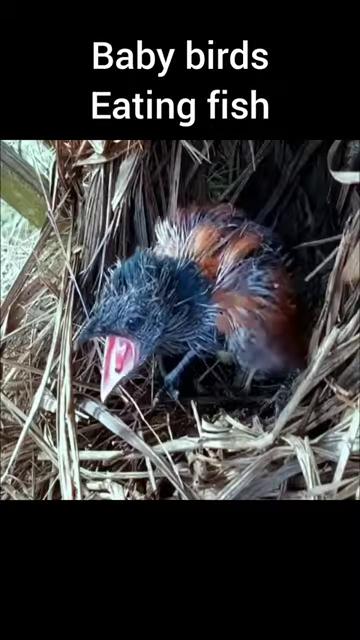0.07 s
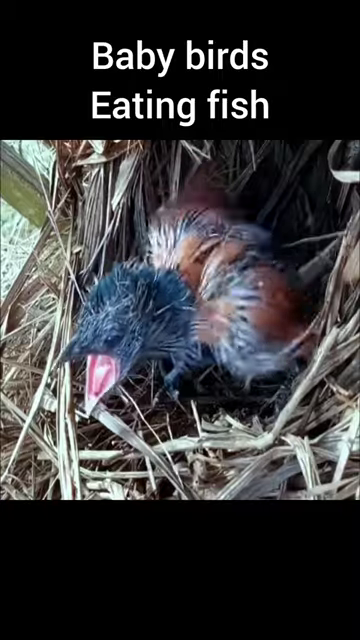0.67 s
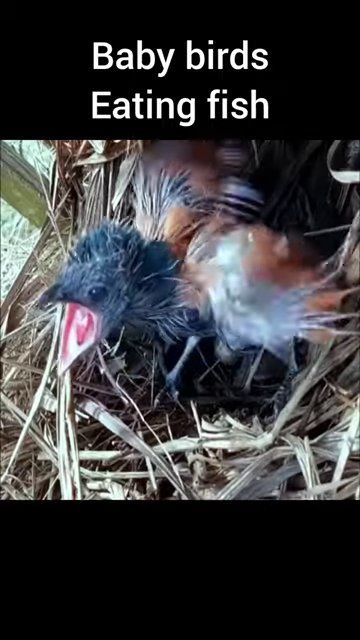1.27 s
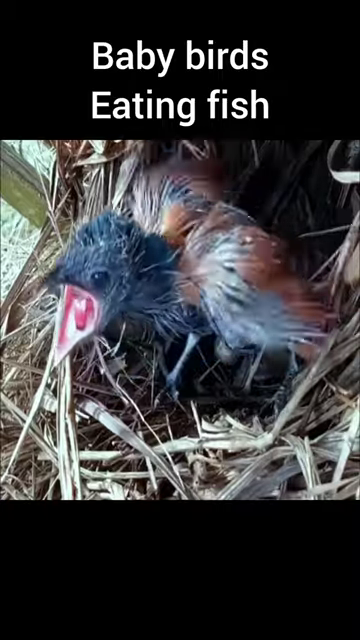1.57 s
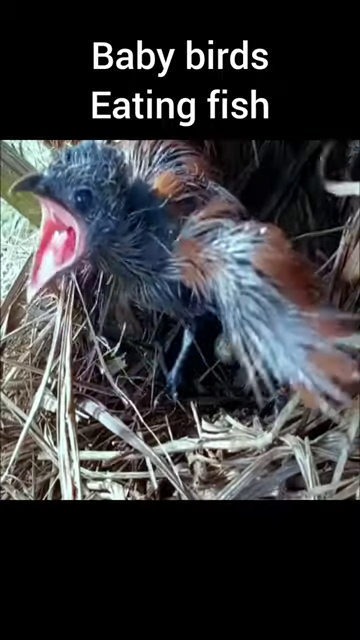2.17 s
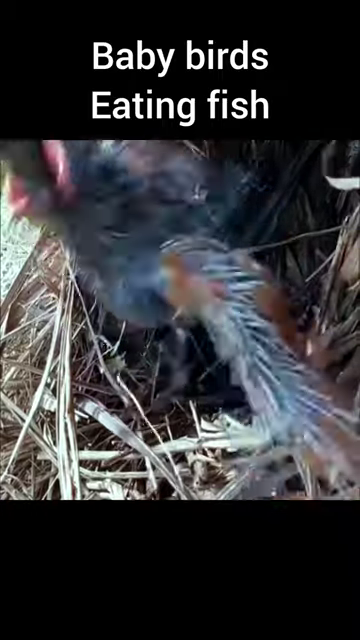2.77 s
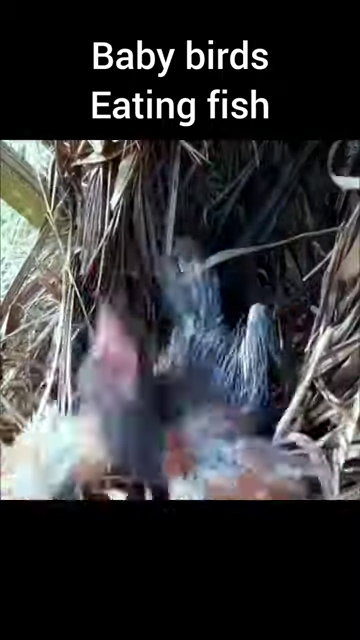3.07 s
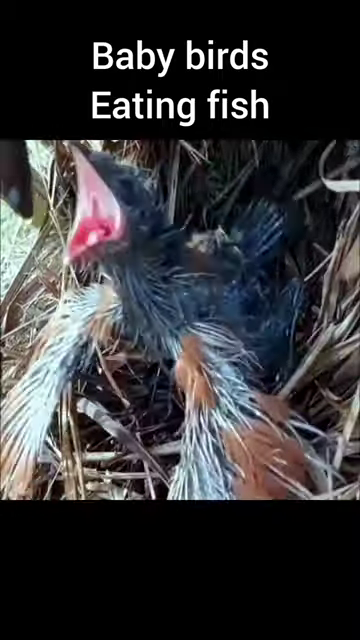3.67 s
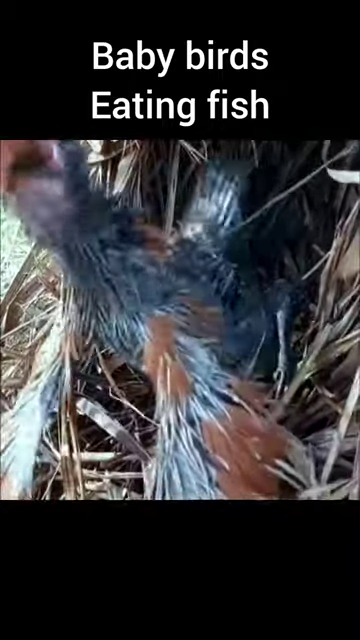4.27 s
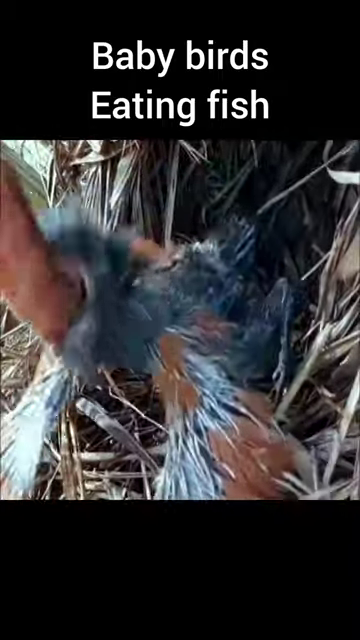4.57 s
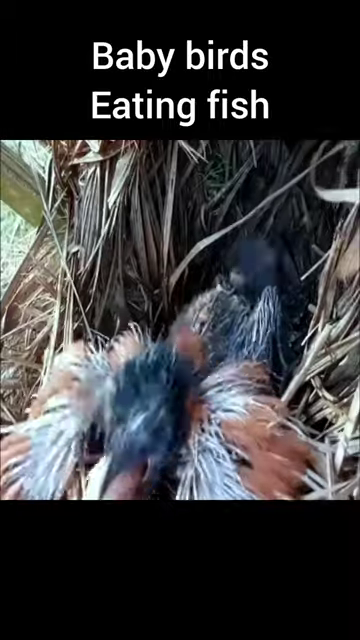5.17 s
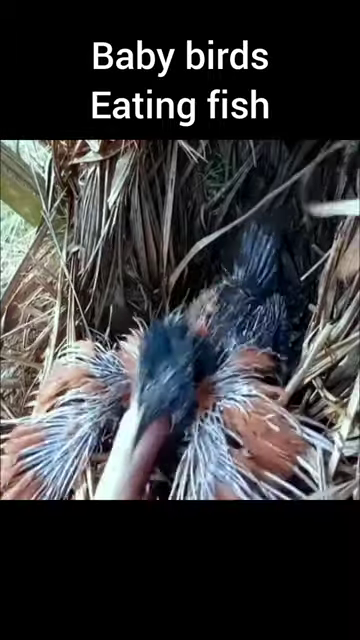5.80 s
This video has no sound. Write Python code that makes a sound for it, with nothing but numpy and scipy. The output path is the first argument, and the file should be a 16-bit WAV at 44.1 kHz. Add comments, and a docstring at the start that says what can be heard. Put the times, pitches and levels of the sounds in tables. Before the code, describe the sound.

A baby bird hisses harshly six times up close, then gulps and rustles in its dry nest, with a faint engine drone far off.

```python
"""A nest of dry leaves, a stereo microphone right beside it. An engine drones far off; the litter stirs.
A nestling gapes and hisses six times: a spit of pent-up air, then ragged turbulence in its throat,
whose resonance sinks as the beak closes. From the fourth hiss on come soft low thumps, ticks of
beak and straw and quiet murmurs. The bird gives a short gulping rasp, then shuffles in the litter,
dragging its quills over the straw and shoving against the woven floor."""
import sys
import numpy as np
from scipy import signal
from scipy.fft import rfft, irfft, next_fast_len
from scipy.io import wavfile
from scipy.ndimage import uniform_filter1d, map_coordinates

SR = 44100
rng = np.random.default_rng(int(sys.argv[2]) if len(sys.argv) > 2 else 0)


def master_out(mix):
    """Clip the mix to full scale and print it as 16-bit PCM to the path in sys.argv[1]."""
    frames = np.transpose(np.atleast_2d(mix))
    ceiling = np.clip(frames, -1, 1)
    pcm = np.round(ceiling * 32767).astype(np.int16)
    wavfile.write(sys.argv[1], SR, pcm)


N = 266319
TIME = np.arange(N) / SR


def amp(db):
    """Decibels to gain."""
    return 10 ** (np.asarray(db) / 20)


def unit(x):
    """Scale to rms 1."""
    return x / np.sqrt(np.mean(x ** 2) + 1e-20)


def along(points, hz):
    """Read (f/Hz, value) points on a log frequency axis."""
    f, v = np.transpose(points)
    return np.interp(np.log(hz + 1), np.log(f + 1), v)


def curves(rows, t=TIME):
    """Each column after the time, read at the times t."""
    s, *cols = np.transpose(rows)
    return [np.interp(t, s, c) for c in cols]


def wobble(rate):
    """A smooth random curve, rate knots a second."""
    return map_coordinates(rng.standard_normal(int(N * rate / SR) + 4), [TIME * rate], order=2)


def filtered(x, response):
    """Pass x through a response given as a function of frequency."""
    m = next_fast_len(N + SR // 4)
    return irfft(rfft(x, m) * response(np.fft.rfftfreq(m, 1 / SR)), m)[..., :N]


def coloured(x, spectrum):
    """Shape x by (f/Hz, level/dB) points, at rms 1."""
    return unit(filtered(x, lambda hz: amp(along(spectrum, hz))))


def resonance(hz, centre, width):
    """Gain of one resonance, 1 at its centre."""
    return 1 / np.sqrt(1 + (2 * (hz - centre) / width) ** 2)


def lumps(shape, frames):
    """A random field over frequency and time, smoothed along both, at rms 1."""
    field = uniform_filter1d(rng.standard_normal(shape), size=3, axis=-2)
    return unit(uniform_filter1d(field, size=frames, axis=-1))


def patchy(x, depth_db, frames):
    """Patches of the spectrum, a few hundred Hz wide, come and go."""
    z = signal.stft(x, nperseg=512)[2]
    return signal.istft(z * amp(depth_db * lumps(z.shape, frames)), nperseg=512)[1][..., :N]


def strokes(rows):
    """Gain of body movements that swell and fade."""
    return sum(amp(db) * np.exp(-(2 * (TIME - s) / length) ** 2) for s, length, db in rows)


def airflow():
    """Three rays of unrelated noise: toward the microphone, the left wall and the right wall."""
    return rng.standard_normal((3, N))


def spread(rays, alike):
    """Fold three rays to left and right; alike is the share of power from the direct ray."""
    return np.sqrt(alike) * rays[0] + np.sqrt(1 - alike) * rays[1:]


# the far engine's firing rate: t/s, f/Hz
ENGINE_FIRING = [(2.75, 90.9), (2.95, 80), (4.4, 78.6), (6.04, 75.2)]
# drone and rumble as heard, ducking under the loud hisses: t/s, drone level/dB, rumble level/dB
HEARD_LOW_LEVELS = [(0.4, -41.5, -45), (1.4, -46.5, -46), (1.8, -45, -51.5), (2.45, -48.5, -47.5),
                    (2.85, -44.5, -42.5), (3.15, -50.5, -49.5), (3.75, -53.5, -52), (4.2, -52, -44.5),
                    (6.04, -48, -41.5)]
# the rumble's spectrum: f/Hz, level/dB
RUMBLE_SPECTRUM = [(20, -10), (45, 0), (80, 3), (160, -0.5), (280, -12.5), (420, -13.5), (700, -17),
                   (1500, -58), (5000, -27.5), (15000, -36)]


def engine(waver, second_db, throb_db):
    """An engine far away: only the lowest firing orders and a rumble carry to the microphone."""
    firing_hz, = curves(ENGINE_FIRING)
    drone_db, rumble_db = curves(HEARD_LOW_LEVELS)
    phase = 2 * np.pi * np.cumsum(firing_hz * (1 + waver * wobble(25))) / SR
    orders = unit(np.sin(phase) + amp(second_db) * np.sin(2 * phase))
    drone = amp(drone_db + throb_db * wobble(18)) * orders
    air = rng.standard_normal(N) + 0.5 * rng.standard_normal((2, N))
    return drone + amp(rumble_db) * coloured(air, RUMBLE_SPECTRUM)


# faint, constant stirring of the litter: t/s, level/dB
LITTER_STIR = [(2.3, -53.5), (4.0, -57), (4.6, -48), (5.8, -49.5)]
# the bird's shuffles: middle t/s, length/s, level/dB
LITTER_SHUFFLES = [(0.5, 0.4, -41), (1.6, 0.33, -45), (2.94, 0.64, -39), (4.25, 0.72, -48),
                   (4.785, 0.12, -41), (4.89, 0.11, -36.5), (5.02, 0.18, -40.5), (5.14, 0.14, -37),
                   (5.255, 0.075, -39), (5.41, 0.11, -40), (5.54, 0.19, -41), (5.99, 0.15, -37)]
# dry leaves at close range: f/Hz, level/dB
LITTER_SPECTRUM = [(150, -32), (330, -3.5), (600, -3), (1300, -6), (2200, -4.5), (4000, -2.5), (6400, -4),
                   (8000, -8.5), (15000, -7.5)]


def litter(crackle, uneven_db, snaps_per_s, snap_db):
    """Close by, quills scrape dry leaves in dense small crackles, and single fibres snap."""
    stir_db, = curves(LITTER_STIR)
    motion = np.hypot(amp(stir_db), strokes(LITTER_SHUFFLES)) * amp(uneven_db * wobble(23.91))
    snapping = rng.random((2, N)) < snaps_per_s / SR
    snaps = amp(snap_db) * snapping * rng.standard_normal((2, N))
    friction = rng.standard_normal((2, N)) + 0.16 * rng.standard_normal(N)
    leaves = snaps + patchy(friction, depth_db=4.0, frames=8)
    return motion * coloured(crackle * leaves, LITTER_SPECTRUM)


# the spit that opens each hiss: t/s, level/dB
BEAK_SPITS = [(.053, -25), (.589, -24), (1.6285, -22), (2.43, -24), (3.044, -24), (3.421, -24)]
# its spectrum: f/Hz, level/dB
SPIT_SPECTRUM = [(300, -20), (1200, -7), (3500, -4), (5500, 0), (9500, -2), (15000, -4)]


def spits(decay_s):
    """Pent-up air breaks loose at the beak in a sharp broadband burst."""
    burst = sum(amp(db) * np.exp(-np.abs(TIME - s) / decay_s) * (TIME >= s) for s, db in BEAK_SPITS)
    return burst * coloured(airflow(), SPIT_SPECTRUM)


# six hisses and the gulp: start t/s, end t/s, attack/s, release/s, throat level/dB,
# then sizzle/dB, ring/dB and rush/dB re the throat, and muffling (weighted by frequency in throat)
CALLS = [(0.053, 0.454, 0.0014, 0.076, -23.5, -3.5, -4.5, -15, 0.5),
         (0.581, 1.476, 0.011, 0.07, -22.5, -3.5, -4, -16.5, -3.5),
         (1.6275, 2.275, 0.00088, 0.066, -22.5, -2, -7.5, -17.5, -4.5),
         (2.424, 2.882, 0.0067, 0.13, -21.5, -5.5, -14, -19.5, 6),
         (3.033, 3.326, 0.012, 0.061, -22.5, -3.5, -8, -17, -3),
         (3.414, 3.955, 0.013, 0.063, -20, -6.5, -6, -23.5, 1.5),
         (4.193, 4.305, 0.035, 0.039, -26, -2, -2, -25, -16)]
# the breath surges and falters: t/s, level change/dB
BREATH_HEAVES = [(0.084, -2), (0.124, -2), (.165, 3), (.62, 1.5), (.68, 0.5), (.94, -1.5), (1.16, 0.5),
                 (1.27, 1), (1.33, 0), (1.86, -2), (1.96, 1), (2.11, -0.5), (2.52, 0.5), (2.599, 1.5),
                 (2.72, -3.5), (3.07, 1.5), (3.14, -1), (3.22, 0.5), (3.53, -2), (3.69, -4), (3.79, 0.5)]
# sizzle at the beak's edges: f/Hz, level/dB
SIZZLE_SPECTRUM = [(5000, -44), (7300, 5), (8000, 0), (11500, 0), (12500, 1.3), (13700, -0.5), (16000, -1)]
# ring of the open gape: f/Hz, level/dB
RING_SPECTRUM = [(6000, -67), (7900, -5.5), (8500, 0), (9250, 1), (10250, -3), (10600, -35), (13000, -50)]
# low rush deep in the gullet: f/Hz, level/dB
RUSH_SPECTRUM = [(230, -51), (330, -10.5), (440, .5), (750, -1.5), (1200, -.5), (1900, -6), (4000, -46)]


def hisses(rasp_db, flutter_db, gurgle_db, sag_db, release_db):
    """Right at the microphone, tiny irregular puffs excite throat, beak, gape and gullet together."""
    start, end, attack, release, level_db, sizzle_db, ring_db, rush_db, _ = call_at(TIME)
    age = np.maximum(TIME - start, 0)
    # the push weakens over a call, then collapses during the release
    collapse = np.maximum(1 + (TIME - end) / release, 0) ** 2
    fade_db = sag_db * age / (end - start) + release_db * collapse
    heave_db = sum(db * np.exp(-((TIME - s) / 0.021) ** 2) for s, db in BREATH_HEAVES)
    push = np.minimum(age / attack, 1) * amp(level_db - fade_db + heave_db + 0.1 * wobble(20))
    puffs = sputter(per_s=38, size_db=-5.5, decay_s=0.00089)
    puffs *= amp(rasp_db * wobble(1500) + flutter_db * wobble(82))

    body = throat(puffs * airflow(), overtone=2.83, overtone_db=-10.5, tongue_db=3.5)
    sizzle = coloured(patchy(puffs * airflow(), depth_db=2.5, frames=8), SIZZLE_SPECTRUM)
    ring = coloured(puffs * airflow(), RING_SPECTRUM)
    rush = coloured(patchy(puffs * airflow(), depth_db=gurgle_db, frames=7), RUSH_SPECTRUM)

    body *= amp(1.5 * np.exp(-age / 0.057))  # pent-up air drives the throat harder at first
    lag_db = 2.5 * np.exp(-age / 0.04)  # sizzle and ring build up as the gape widens
    shut_octaves = closure(curves(THROAT_RESONANCE)[0])
    # a closing beak cuts sizzle and ring and feeds the gullet
    sizzle *= amp(sizzle_db - 5.5 * shut_octaves - lag_db)
    ring *= amp(ring_db - 18 * shut_octaves - lag_db)
    rush *= amp(rush_db + 9 * shut_octaves)
    return push * (body + sizzle + ring + rush)


def call_at(t):
    """The columns of the call nearest to each of the times t."""
    rows = np.array(CALLS)
    changeover = (rows[1:, 0] + rows[:-1, 1]) / 2
    return rows[np.searchsorted(changeover, t)].T


def sputter(per_s, size_db, decay_s):
    """Gain of the airflow: a steady stream with brief spurts at random moments."""
    spurts = (rng.random(N) < per_s / SR) * amp(size_db)
    return 1 + signal.lfilter([1], [1, -np.exp(-1 / (decay_s * SR))], spurts)


def closure(centre_hz, open_hz=5160):
    """How far the beak is shut: octaves by which the throat resonance has sunk below open_hz."""
    return np.maximum(np.log2(open_hz / centre_hz), 0)


# the throat's first resonance, sinking as the beak closes: t/s, f/Hz, height/dB, width/Hz
THROAT_RESONANCE = [(0.05, 6300, -3.5, 2600), (1.4, 6200, 5, 2500), (1.65, 5450, 5, 2800),
                    (2.25, 5726, 0, 2800), (2.43, 5250, 16.5, 2000), (2.68, 4900, 19, 1950),
                    (2.705, 3100, 11, 2000), (2.77, 3440, 13, 1880), (2.82, 2020, -7, 1000),
                    (3.04, 4200, 14, 2200), (3.07, 4750, 5, 2400), (3.1, 5100, 6, 2200),
                    (3.3, 5360, 4.5, 2200), (3.43, 4940, 9.5, 2012), (3.82, 4720, 13, 1900),
                    (3.87, 3640, 22, 2580), (3.93, 3240, 29, 1890), (4.18, 2180, 19, 850),
                    (4.3, 2230, 19, 800)]
# the air in the throat: f/Hz, level/dB
BREATH_SPECTRUM = [(500, -39), (1200, -11), (1900, -4), (2600, -1.5), (3250, -2.5), (4100, -6), (4800, 0),
                   (6200, -1.5), (7500, -2), (8100, -21), (10000, -35), (16000, -43)]


def throat(air, overtone, overtone_db, tongue_db):
    """A short tube open at the beak: a gliding quarter-wave resonance and its next odd mode."""
    hz, t, z = signal.stft(air, SR, nperseg=256)
    hz = hz[:, None]
    centre, height_db, width = curves(THROAT_RESONANCE, t)
    muffling = call_at(t)[-1] + 21 * closure(centre)  # a closing beak dulls the upper band
    muffle_db = muffling * along([(3500, 0.35), (5000, 0.66)], hz)
    first, second = (resonance(hz, mode, width) ** 2 for mode in (centre, overtone * centre))
    tongue = lumps(z.shape[1:], frames=16)  # the tongue keeps shifting the colour
    colour_db = along(BREATH_SPECTRUM, hz) - muffle_db + tongue_db * tongue
    gain = amp(colour_db) * np.hypot(1, amp(height_db) * (first + amp(overtone_db) * second))
    gain /= np.sqrt(np.mean(gain ** 2, axis=0))  # the colour moves, the power holds
    return unit(signal.istft(z * gain, SR, nperseg=256)[1][:, :N])


# soft low thumps: t/s, f/Hz, level/dB
LOW_THUMPS = [(2.384, 93, -31), (4.115, 80, -31), (4.284, 88, -34), (4.769, 76, -28.5), (5.069, 149, -38),
              (5.24, 81, -34), (5.374, 88, -29), (5.41, 85.6, -26.5), (6.006, 75, -26)]


def thumps(rise_s, t60):
    """Each soft thump is a few low cycles dying away, alike in both channels."""
    out = np.zeros(N)
    for s, hz, db in LOW_THUMPS:
        age = np.maximum(TIME - s, 0)
        envelope = amp(db - 60 * age / t60) * (1 - np.exp(-age / rise_s))
        out += envelope * np.sin(2 * np.pi * hz * age)
    return out


# ticks of beak and straw: t/s, level/dB, f/Hz, t60/s
SHARP_TICKS = [(2.389, -39.5, 4500, 0.13), (4.188, -27, 5450, .035), (4.594, -45, 7190, .02),
               (4.615, -40, 6000, 0.03), (4.63, -38, 4980, .025), (4.636, -37, 5110, .02),
               (4.78, -35.5, 5250, .03), (5.083, -34, 4550, .035), (5.114, -37, 4480, 0.023),
               (5.129, -32, 4500, .025), (5.255, -34, 4400, 0.033), (5.3095, -31, 2190, 0.018),
               (5.353, -37, 2150, .025), (5.577, -34, 3840, 0.045), (5.703, -46, 5800, 0.11),
               (5.964, -37, 3370, 0.055)]


def ticks(width_hz):
    """Each tick of beak or straw is a brief crack in one broad resonance."""
    out, noise = np.zeros((3, N)), rng.standard_normal((3, N))
    for s, db, centre, t60 in SHARP_TICKS:
        crack = unit(filtered(noise, lambda hz: resonance(hz, centre, width_hz)))
        out += amp(db - 60 * np.abs(TIME - s) / t60) * (TIME >= s) * crack
    return out


# soft throaty sounds around the calls: middle t/s, length/s, f/Hz, level/dB
THROAT_MURMURS = [(2.806, 0.032, 1050, -32), (3.07, 0.044, 900, -37.5), (3.993, 0.035, 860, -51),
                  (4.344, 0.14, 1670, -53), (4.408, 0.037, 850, -49), (5.35, 0.083, 2120, -40)]


def murmurs(width_share):
    """Weak puffs through a narrow, nearly closed throat."""
    out, air = np.zeros((3, N)), airflow()
    for s, length, centre, db in THROAT_MURMURS:
        breath = unit(filtered(air, lambda hz: resonance(hz, centre, width_share * centre) ** 3))
        out += strokes([(s, length, db)]) * breath
    return out


# quill strokes: middle t/s, length/s, level/dB
QUILL_SCRAPES = [(4.89, 0.094, -42.5), (5.14, 0.16, -41), (5.257, 0.034, -45), (5.99, 0.058, -47)]
# the scraped straw: f/Hz, level/dB
STRAW_SPECTRUM = [(1500, -28), (3000, -4), (4200, 2), (6200, -4), (7500, -10), (15000, -17)]


def scrapes(crackle):
    """A quill drags along a single straw near the microphone."""
    return strokes(QUILL_SCRAPES) * coloured(crackle * rng.standard_normal((2, N)), STRAW_SPECTRUM)


# the body's hardest pushes: middle t/s, length/s, level/dB
FLOOR_SHOVES = [(4.88, 0.059, -52), (5.135, 0.11, -44)]
# the woven floor: f/Hz, level/dB
WEAVE_SPECTRUM = [(120, -28), (300, 8), (650, -8), (1300, -1), (2200, -25), (6000, -31)]


def shoves(crackle):
    """The body pushes against the nest's woven floor and flexes it."""
    flexing = patchy(crackle * rng.standard_normal(N), depth_db=1.5, frames=7)
    return strokes(FLOOR_SHOVES) * coloured(flexing, WEAVE_SPECTRUM)


# stereo image of the hiss: f/Hz, left lead/rad, diffuse level/dB re direct
HISS_IMAGE = [(100, .05, -6), (600, 0.19, -5), (1200, 0.7, -2), (1630, 1.93, -1.5), (2000, 2.1, 3),
              (2310, 2.4, -4.5), (2544, 2.69, -5.5), (2670, 3.06, -18), (2880, 3.45, -13.5), (3095, 3.2, 5),
              (3560, 3, 12), (3790, 3.2, 7), (4000, 3.17, -24), (4220, 3.1, -19), (4390, 4.6, 4),
              (4680, 5.03, -3.5), (5050, 6.4, -5), (5650, 7.3, -3), (5980, 8.3, -2), (6450, 9.5, -6),
              (7080, 8.5, 3), (7400, 13.7, 7), (8160, 12.6, 1), (8600, 13.8, -5), (9240, 14.1, 3),
              (10400, 15.5, 7), (11100, 16.1, 4.5), (12450, 18.9, -17), (13300, 20.8, -13),
              (13900, 21.6, 0), (14700, 25.7, 7)]
# its balance at the microphone: f/Hz, left minus right level/dB
HISS_BALANCE = [(100, 1), (600, 2), (1300, 0), (1800, 2.5), (2750, 0), (3300, 4.5), (4000, -1.5),
                (4400, -1), (4850, 1), (5350, -1.5), (6200, 3.5), (7300, 6), (8000, 3.5), (8850, 2.5),
                (9200, -7.5), (10200, 1), (10800, -0.5), (15000, .5)]


def stereo_image(rays):
    """The direct sound leads on the left and joins the walls' echoes, in shares set by frequency."""
    image = np.array(HISS_IMAGE)
    lead, diffuse_db = image[:, [0, 1]], image[:, [0, 2]]
    sides = np.array([[.5], [-.5]])
    diffuse = lambda hz: amp(along(diffuse_db, hz))
    balance = lambda hz: amp(along(HISS_BALANCE, hz) * sides)
    direct = filtered(rays[0], lambda hz: np.exp(1j * along(lead, hz) * sides))
    echoes = filtered(walls(spread(rays, alike=.84), t60=0.047, pose_s=.13), diffuse)
    return filtered(direct + echoes, lambda hz: balance(hz) / np.hypot(1, diffuse(hz)))


def walls(pair, t60, pose_s):
    """The straw walls return brief echoes, different left and right and for each pose of the head."""
    t = TIME[:SR // 20]
    echoes = np.zeros((2, N + len(t)))
    for s in np.arange(0, TIME[-1], pose_s):
        straw = rng.standard_normal((2, len(t))) * amp(-60 * t / t60)
        straw /= np.linalg.norm(straw, axis=1, keepdims=True)
        near = np.flatnonzero(np.abs(TIME - s) < pose_s)
        pose = np.sqrt(1 - np.abs(TIME[near] - s) / pose_s)  # one pose blends into the next
        answer = signal.fftconvolve(pose * pair[:, near], straw, axes=1)
        echoes[:, near[0]:near[0] + answer.shape[1]] += answer
    return echoes[:, :N]


# the head swings from side to side: t/s, extra left lead/ms
HEAD_SWING = [(0.3, -0.015), (0.8, -0.011), (2.1, -0.0059), (2.6, 0.019), (3.15, -0.032), (3.6, 0.019),
              (4.2, -0.01)]


def swing(pair):
    """As the head moves, its sound reaches one capsule a little sooner and the other later."""
    hz, t, z = signal.stft(pair, SR, nperseg=512)
    lead_ms, = curves(HEAD_SWING, t)
    turn = np.exp(1j * np.pi * hz[:, None] * lead_ms / 1000)  # half the lead to each side
    return signal.istft(z * np.array([turn, turn.conj()]), SR, nperseg=512)[1][:, :N]


def foliage(pair, t60, wet_db):
    """The leaves around the nest return a weak wash after 6 ms, different at each capsule."""
    t = TIME[:SR // 8]
    tail = rng.standard_normal((2, len(t))) * amp(-60 * t / t60) * (t > .006)
    tail /= np.linalg.norm(tail, axis=1, keepdims=True)
    return pair + amp(wet_db) * signal.oaconvolve(pair, tail, axes=1)[:, :N]


def scene(start_s=0.048):
    """The bird and its nest close to the microphone, over the far drone."""
    drone = engine(waver=0.045, second_db=-32, throb_db=3.0)
    crackle = amp(1.6 * wobble(76))  # uneven friction, shared by leaves, straw and floor
    leaves = litter(crackle, uneven_db=1.33, snaps_per_s=130, snap_db=17.5)
    calls = hisses(rasp_db=0.5, flutter_db=0.58, gurgle_db=3.0, sag_db=1.5, release_db=34.5)
    calls += murmurs(width_share=0.97)
    # from the beak's tip and the top straws, clear of the walls' echoes
    snaps = spread(spits(decay_s=.009) + ticks(width_hz=2100), alike=.3)
    bird = foliage(swing(stereo_image(calls)) + snaps, t60=0.023, wet_db=-24)
    shuffling = leaves + scrapes(crackle) + shoves(crackle)
    return (TIME > start_s) * (drone + shuffling + bird + thumps(rise_s=0.0063, t60=0.2))


def record(dry):
    """Nothing passes above 15.2 kHz."""
    return filtered(dry, lambda hz: hz < 15200)


dry = scene()
out = record(dry)
master_out(out)
```